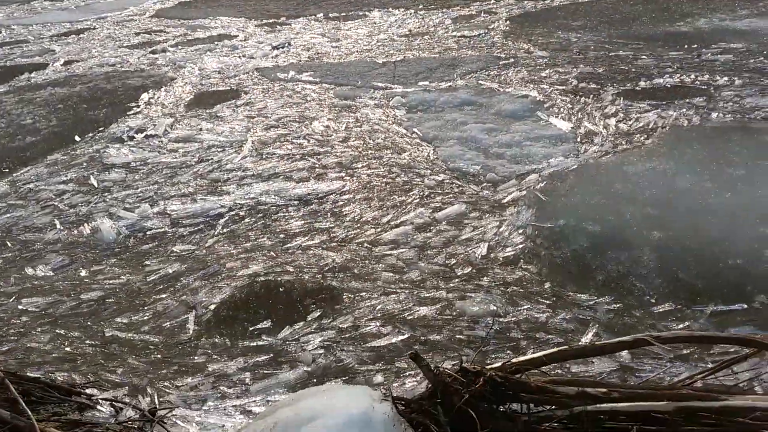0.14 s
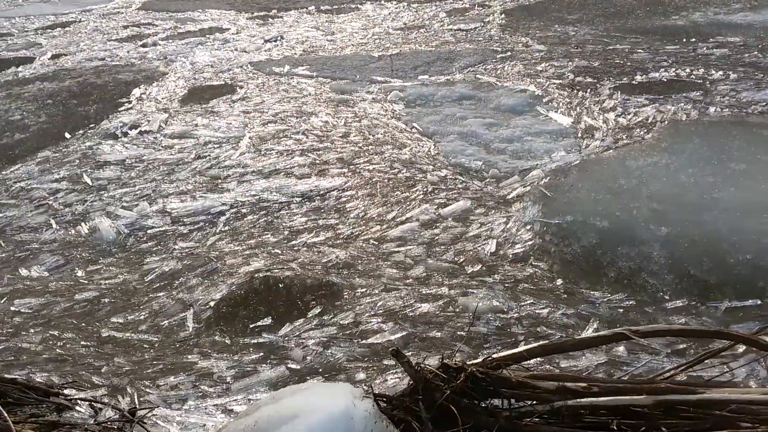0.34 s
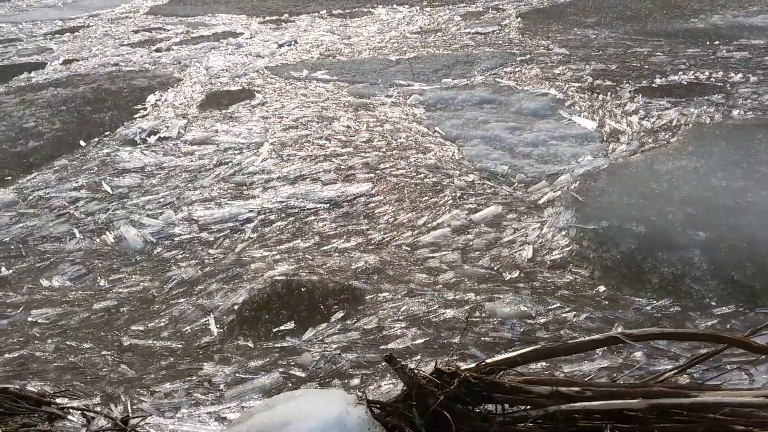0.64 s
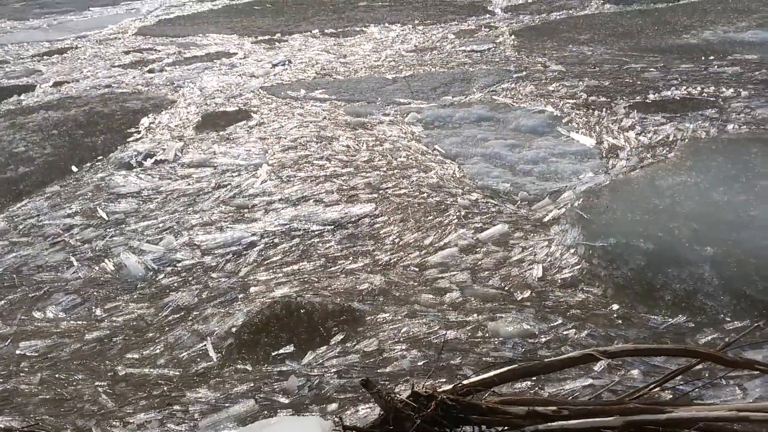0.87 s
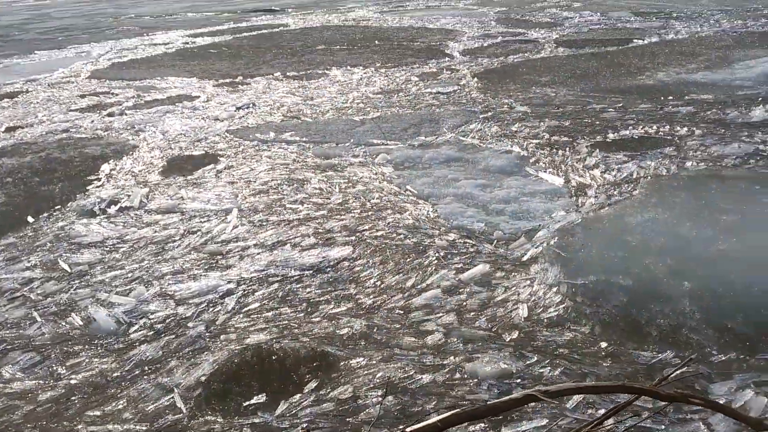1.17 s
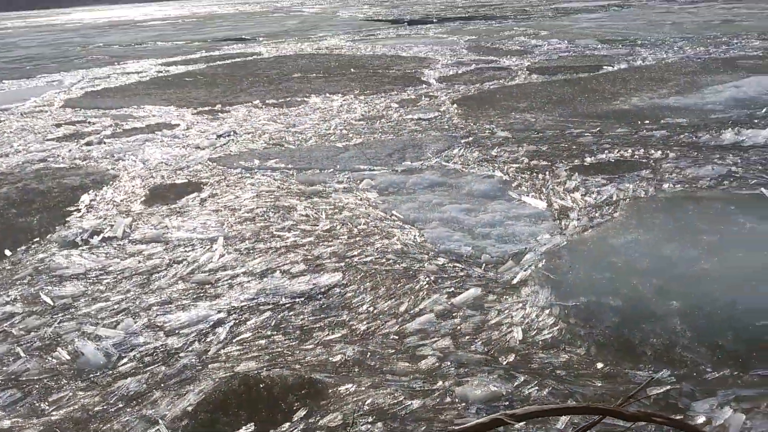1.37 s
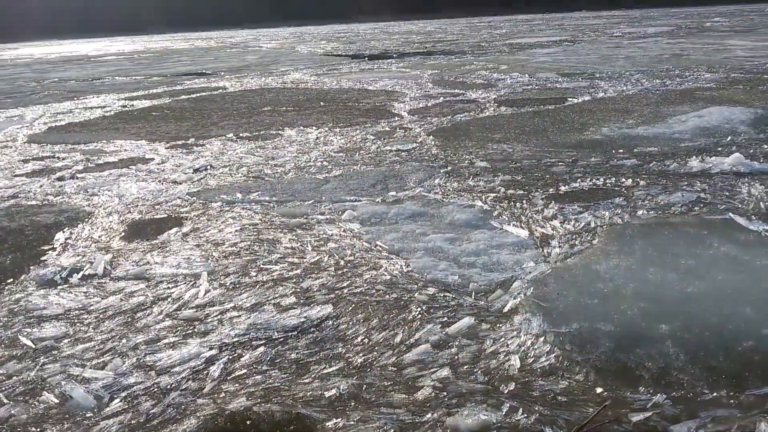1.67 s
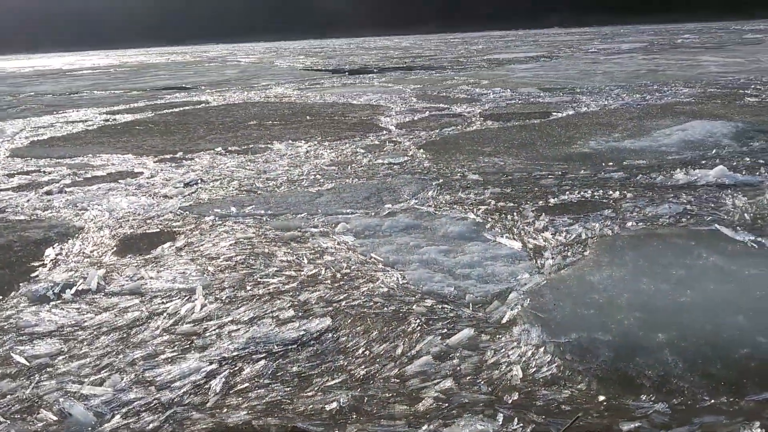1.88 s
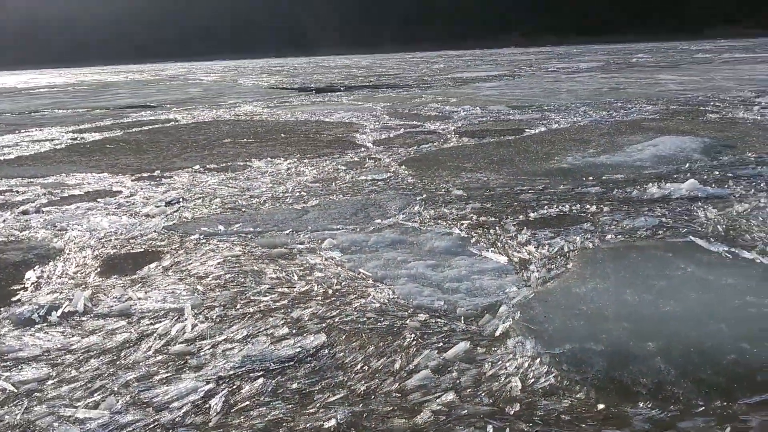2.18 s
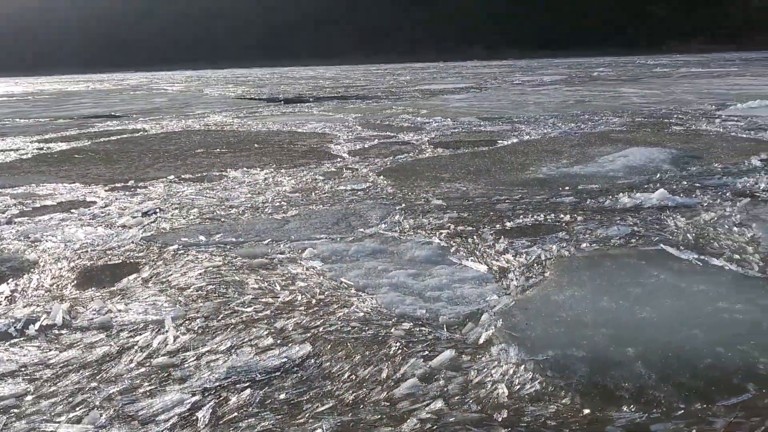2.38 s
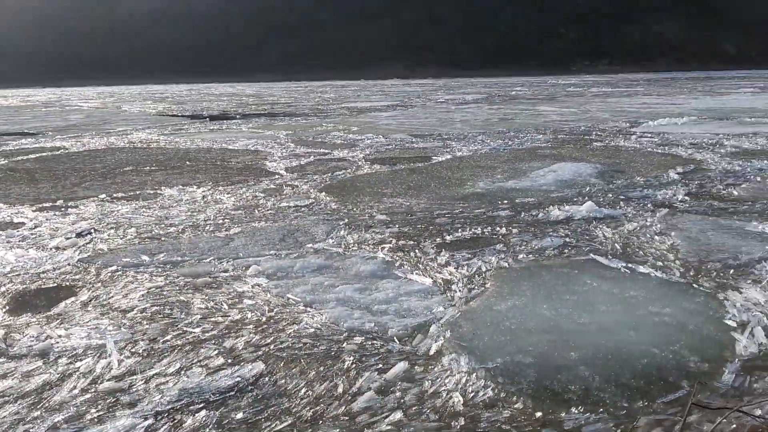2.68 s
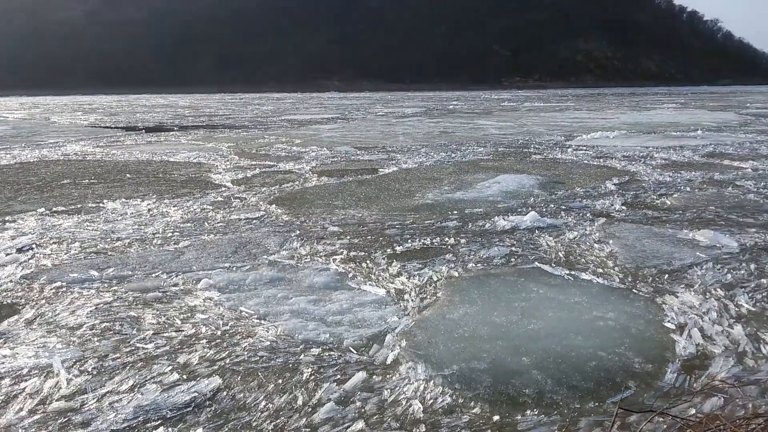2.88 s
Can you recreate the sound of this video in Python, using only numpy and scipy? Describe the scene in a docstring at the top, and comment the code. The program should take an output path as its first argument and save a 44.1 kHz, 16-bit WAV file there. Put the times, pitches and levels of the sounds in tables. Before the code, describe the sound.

Drifting river ice and slush hiss and tinkle throughout the three seconds, swelling slightly as floes press together. Single ice needles clink clearly, around 0.1, 0.5, 1.1, 1.7 and 2 seconds, then several times from 2.4 on. Wind flutters on the microphone, with short buffets and thumps around 0.8 to 1.1 seconds and from 1.8, the strongest near 2.9. Water washes softly and low underneath.

```python
"""River ice in the wind

Broken ice drifts down a wide river. Countless ice needles and crumbs of slush rub and tinkle
together as a steady hiss that surges when the floes press on each other. A few needles clink clearly.
Wind flutters over the microphone, with rough buffets and sharp thumps. The water washes softly below."""
import sys
import numpy as np
from scipy import signal
from scipy.fft import rfft, irfft
from scipy.io import wavfile
from scipy.ndimage import uniform_filter1d

SR = 44100
rng = np.random.default_rng(int(sys.argv[2]) if len(sys.argv) > 2 else 0)


def wav_record(signal):
    """Record a signal, one row per channel, as 16-bit PCM in the file named by sys.argv[1]."""
    frames = np.transpose(np.atleast_2d(signal))
    bounded = np.clip(frames, -1, 1)
    # unit amplitude maps onto the largest positive 16-bit level
    quanta = np.round(bounded * 32767).astype(np.int16)
    wavfile.write(sys.argv[1], SR, quanta)


N = 133623
TIME = np.arange(N) / SR


def ice(tinkle_db=-11):
    """Near needles tinkle over the blur of the far ones; both swell as the floes press together."""
    # How hard the coarse slush grinds and the fine crumbs fizz. Each row: time in seconds, level in dB.
    slush_levels = [(0, -24), (.065, -24), (.095, -19.5), (.17, -23), (.32, -25.5), (.41, -25),
                    (.73, -26.2), (.78, -22), (.86, -25), (.97, -22.3), (1.04, -26.5), (1.1, -23),
                    (1.4, -25.5), (1.58, -26), (1.67, -24.5), (1.785, -25.5), (1.812, -19.5), (1.89, -25.5),
                    (1.93, -22), (2.03, -24), (2.13, -27), (2.2, -22.5), (2.38, -27), (2.45, -22),
                    (2.48, -24.8), (2.63, -21.5), (2.69, -24), (2.88, -27), (2.97, -22.5), (3.03, -23.5)]
    crumb_levels = [(0.0, -32), (0.1, -28), (0.29, -32.5), (0.73, -33.5), (0.77, -29.5), (1.06, -30.5),
                    (1.1, -28), (1.32, -32.5), (1.65, -32), (1.77, -30), (1.84, -29.5), (2.02, -27.5),
                    (2.14, -31.5), (2.19, -28.5), (2.35, -31.5), (2.57, -27), (2.7, -29), (2.88, -32),
                    (2.94, -28), (2.95, -30.5), (3.03, -26.5)]
    # The tone of the slush and of the crumbs. Each row: frequency in Hz, gain in dB.
    slush_tone = [(300, -62), (700, -13), (1100, -8), (1450, -3.5), (1800, 1), (2600, -1.5), (3200, -2),
                  (3900, -11), (5000, -16), (9000, -72)]
    crumb_tone = [(1500, -8.5), (3200, 1), (4200, -2), (5300, 0.5), (6600, -2.5), (8000, -9.5),
                  (9800, -16.5), (11000, -29.5), (13000, -29.5), (14500, -65)]
    slush = far_needles(patch_db=1.25, flicker_db=0.63) + amp(tinkle_db) * near_needles(1201, 4176)
    crumbs = far_needles(patch_db=2.0, flicker_db=0.85) + amp(tinkle_db) * near_needles(3654, 11770)
    coarse = level(slush_levels) * steadied(colour(slush, slush_tone), size=3000)
    fine = level(crumb_levels) * steadied(colour(crumbs, crumb_tone), size=3000)
    return amp(0.24) * coarse + amp(0.33) * fine


def far_needles(patch_db, flicker_db):
    """Distant ice blurs into a hiss that flickers, both as a whole and in small patches of pitch."""
    real, imaginary, patches = rng.standard_normal((N // 128 + 5, 257, 3)).T  # grids of pitch by time
    patches = uniform_filter1d(patches, size=7, axis=0)
    patches = unit(uniform_filter1d(patches, size=12, axis=1))
    flicker = unit(uniform_filter1d(rng.standard_normal(real.shape[1]), size=7))
    spectrum = (real + 1j * imaginary) * amp(patch_db * patches + flicker_db * flicker)
    return unit(signal.istft(spectrum, nperseg=512, noverlap=384)[1][:N])


def near_needles(low_hz, high_hz, pitches=28, knocks_per_s=3000, spread_db=3.5, ring_cycles=6.4):
    """Needles of many lengths knock together at random, each ringing for a few cycles."""
    t, out = TIME[:1500], np.zeros(N)
    for hz in np.geomspace(low_hz, high_hz, pitches):
        knocks = rng.random(N) < knocks_per_s / pitches / SR
        strengths = amp(spread_db * np.minimum(rng.exponential(1, N), 4.5))
        ring = np.sin(2 * np.pi * hz * rng.uniform(0.9235, 1.02) * t) * np.exp(-t * hz / ring_cycles)
        out += hz * signal.oaconvolve(knocks * strengths, ring)[:N]
    return unit(out)


def clink(db, hz, rise_s=0.0033, decay_s=0.0092, roughness=0.18, grit_db=-6.5):
    """A needle scrapes its neighbour and rings briefly, in a puff of grit."""
    t = TIME[:3000]
    waver = unit(signal.lfilter(*signal.butter(2, 400, fs=SR), rng.standard_normal((2, len(t)))))
    ring = np.sin(2 * np.pi * hz * t + roughness * waver[0]) * (1 + roughness * waver[1])
    band = signal.butter(2, [hz * 0.81, hz], "bandpass", fs=SR)
    grit = unit(signal.filtfilt(*band, rng.standard_normal(len(t))))
    shape = np.minimum(t / rise_s, 1) * np.exp(-t / decay_s)
    return amp(db) * shape * (ring + amp(grit_db) * grit)


def wind(upper_db=-8):
    """Lumpy flutter on the microphone that brightens as the wind grows."""
    # The strength of the wind. Each row: time in seconds, level in dB.
    wind_levels = [(0, -30), (.2, -28.5), (.36, -25.5), (.41, -29.5), (.58, -28.5), (.73, -25.5),
                   (.79, -25), (.88, -25.5), (.96, -26), (1.05, -25), (1.11, -30), (1.2, -26), (1.3, -41),
                   (1.44, -28), (1.5, -33), (1.56, -25), (1.66, -37.5), (1.76, -36.5), (1.83, -28.5),
                   (1.95, -26.5), (2.0, -36), (2.12, -32.5), (2.24, -22.5), (2.3, -33), (2.35, -22.5),
                   (2.39, -31.5), (2.47, -31.5), (2.53, -23.5), (2.6, -23.5), (2.69, -37), (2.76, -25.5),
                   (2.81, -29), (2.88, -28), (2.94, -16), (3.03, -24)]
    # The tone of its rumble. Each row: frequency in Hz, gain in dB.
    wind_tone = [(20, -31), (45, -34), (80, -10), (125, -1), (250, 2), (370, -6), (500, -10), (750, -24),
                 (1200, -49), (3000, -75)]
    force = level(wind_levels)
    lumps = amp(2.0 * colour(rng.standard_normal(N), [(5, -5), (45, -5), (120, -52), (500, -80)]))
    rumble = amp(-2.0) * lumps * steadied(colour(rng.standard_normal(N), wind_tone), size=1800)
    upper = amp(upper_db) * force / force.max() * swirls(low_hz=297, high_hz=630)
    return force * (rumble + upper + bumps(low_hz=168, high_hz=350))


def swirls(low_hz, high_hz):
    """Churning air makes noise that fades away outside two frequencies."""
    hz = np.fft.rfftfreq(N, 1 / SR) + 1
    band = 1 / np.sqrt((1 + (low_hz / hz) ** 8) * (1 + (hz / high_hz) ** 6.3))
    noise = irfft(rfft(rng.standard_normal(N)) * band, N)
    return steadied(unit(noise), size=700)


def buffet(length, db, low_hz, high_hz, rise_s=0.0047, fall_s=0.011):
    """A short, rough burst of churning air hits the microphone."""
    t = np.arange(0, length, 1 / SR)
    shape = np.clip(np.minimum(t / rise_s, (length - t) / fall_s), 0, 1)
    return amp(db) * shape * swirls(low_hz, high_hz)[:len(t)]


def thump(db, hz, decay, sag, sag_s=0.0049):
    """One swirl of air swings the pressure a few times, starting high in pitch and falling."""
    t = TIME[:2000]
    pitch = hz * (1 - sag + 2 * sag * np.exp(-t / sag_s))
    turns = np.cumsum(pitch) / SR
    age = 2 * t / decay  # the swell peaks at age 1
    return -amp(db) * age * np.exp(1 - age) * np.sin(2 * np.pi * turns)


def bumps(low_hz, high_hz, pitches=8, hits_per_s=40, spread_db=5, decay_cycles=1.1):
    """Small swirls of several sizes bump the microphone at random."""
    out = np.zeros(N)
    for hz in np.geomspace(low_hz, high_hz, pitches):
        hits = rng.random(N) < hits_per_s / pitches / SR
        strengths = amp(spread_db * (2 * rng.random(N) - 1.5))
        bump = thump(db=5, hz=hz, decay=decay_cycles / hz, sag=0.71)
        out += signal.oaconvolve(hits * strengths, bump)[:N]
    return out


def water(db=-40):
    """The low, even wash of the river."""
    # The tone of the water. Each row: frequency in Hz, gain in dB.
    water_tone = [(20, -26), (60, 5.5), (130, 13), (250, -8), (500, -14), (900, -0.5), (2000, -48)]
    return amp(db) * colour(rng.standard_normal(N), water_tone)


def amp(db):
    """Turns decibels into a number to multiply by."""
    return 10 ** (np.asarray(db) / 20)


def unit(x):
    """Scales a sound to an average power of 1."""
    return x / np.sqrt(np.mean(x ** 2) + 1e-20)


def level(curve):
    """Joins (seconds, dB) points into a volume curve."""
    return amp(np.interp(TIME, *np.transpose(curve)))


def colour(x, points):
    """Shapes the tone by (Hz, dB) points, then scales to an average power of 1."""
    hz, db = np.transpose(points)
    frequencies = np.fft.rfftfreq(N, 1 / SR)
    gain = amp(np.interp(np.log(frequencies + 1), np.log(hz), db))
    return unit(irfft(rfft(x) * gain, N))


def steadied(x, size):
    """Evens out chance swells longer than size samples."""
    power = uniform_filter1d(uniform_filter1d(x ** 2, size), size)
    return x / np.sqrt(abs(power) + 1e-9)


def add(mix, start_s, sound):
    """Mixes a sound in at its start time."""
    part = mix[max(round(start_s * SR), 0):][:len(sound)]
    part += sound[:len(part)]


def scene():
    """Ice, water and wind together in one channel."""
    # Needles that clink clear of the hiss. Each row: start in seconds, level in dB, pitch in Hz.
    needle_clinks = [(.109, -21, 1794), (0.129, -32.5, 10770), (.420, -28, 7200), (.471, -19.5, 2150),
                     (.781, -23.5, 1750), (.973, -27, 6030), (1.093, -24, 7150), (1.094, -35, 11450),
                     (1.095, -19, 3790), (1.661, -14.5, 3014), (2.007, -34, 10700), (2.018, -22, 6720),
                     (2.024, -19, 3090), (2.064, -23, 6760), (2.401, -24, 5200), (2.44, -26, 5450),
                     (2.452, -18, 1560), (2.571, -45, 12600), (2.601, -17.5, 1470), (2.649, -27, 3110),
                     (2.935, -18.5, 4950), (2.969, -17.5, 2240), (2.978, -24, 6200)]
    # Bursts of wind. Each row: start and length in seconds, level in dB, low and high edge in Hz.
    wind_buffets = [(0.766, 0.07, -24, 130, 470), (.912, 0.049, -25, 190, 510),
                    (0.952, 0.074, -27, 150, 440), (1.066, 0.069, -24, 139, 460),
                    (1.535, 0.017, -20.5, 160, 420), (1.917, 0.017, -19.5, 300, 556),
                    (2.044, .016, -25, 170, 378), (2.203, 0.03, -21.5, 170, 397),
                    (2.424, 0.019, -23.5, 330, 560), (2.49, 0.021, -25, 150, 460),
                    (2.517, 0.037, -19, 119, 540), (2.561, 0.05, -19.5, 150, 620),
                    (2.883, 0.023, -21.5, 230, 477), (2.932, .016, -10.5, 300, 1000),
                    (2.971, .042, -15, 149, 374)]
    # Single swirls that thump the microphone. Each row: start in seconds, level in dB,
    # middle pitch in Hz, decay in seconds, how far the pitch sags from 0 to 1.
    wind_thumps = [(.7596, -10, 376, 0.0041, 0.28), (0.861, -16, 190, .007, 0.1),
                   (0.9142, -10.5, 278, 0.0047, 0.22), (0.9263, -11.5, 259, 0.0044, .3),
                   (1.0712, -12, 268, 0.0029, 0.33), (1.092, -14, 238, 0.0064, 0.55),
                   (1.1114, -12, 272, 0.0044, 0.44), (1.7928, -15, 738, 0.0043, 0.23),
                   (1.794, -15, 330, 0.0064, 0.62), (1.859, -20.5, 315, 0.0057, 0.6),
                   (1.917, -9, 251, 0.0057, 0.22), (1.9281, -10.5, 467, 0.0035, .4),
                   (2.1865, -8, 239, 0.0043, 0.3), (2.199, -11.5, 140, .007, 0.3),
                   (2.27, -15.5, 322, 0.003, 0.7), (2.4266, -5, 292, 0.0036, .45),
                   (2.532, -15, 327, 0.0024, .4), (2.5423, -9.5, 250, 0.0032, 0.5),
                   (2.565, -8.5, 363, 0.0041, .1), (2.587, -9.5, 182, 0.011, 0.22),
                   (2.6001, -11.5, 140, 0.0057, 0.47), (2.6093, -8.5, 376, 0.003, 0.08),
                   (2.9096, -10.5, 504, 0.0025, 0.2), (2.9339, 2, 327, 0.0022, 0.61),
                   (2.9632, -6.5, 195, .0065, 0.15)]
    mix = ice() + water() + wind()
    for source, rows in (clink, needle_clinks), (buffet, wind_buffets), (thump, wind_thumps):
        for start, *row in rows:
            add(mix, start, source(*row))
    return mix[None]


def record(dry, ceiling=1.0, cutoff_hz=14300):
    """Rounds off any peak that nears the ceiling, then cuts the highest treble."""
    limited = dry / (1 + (dry / ceiling) ** 20) ** (1 / 20)
    treble_cut = signal.firwin(511, cutoff_hz, window=("kaiser", 9), fs=SR)
    return signal.oaconvolve(limited, treble_cut[None], "same")


dry = scene()
out = record(dry)
wav_record(out)
```